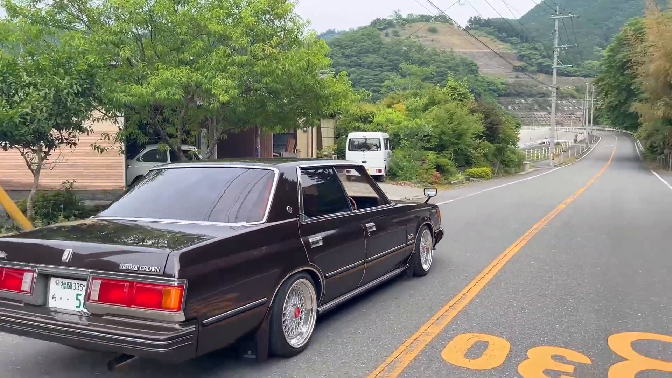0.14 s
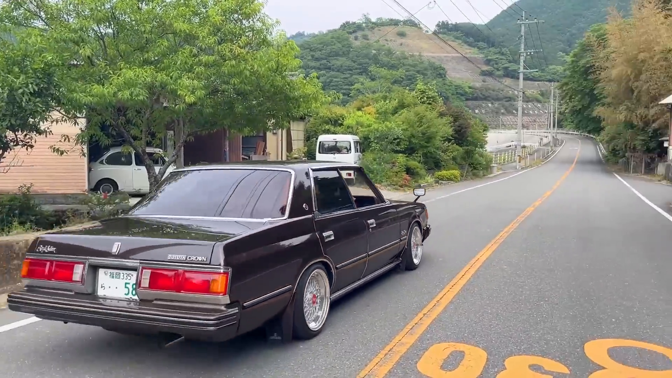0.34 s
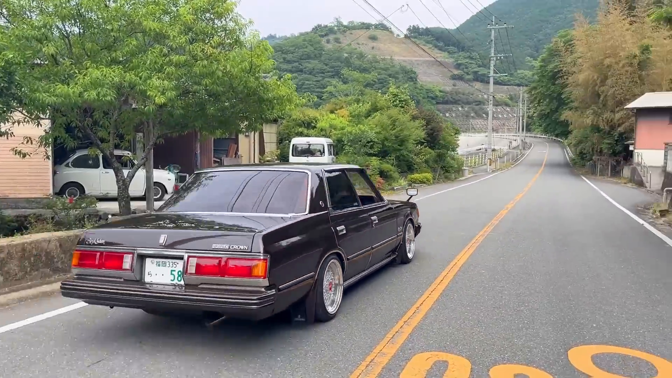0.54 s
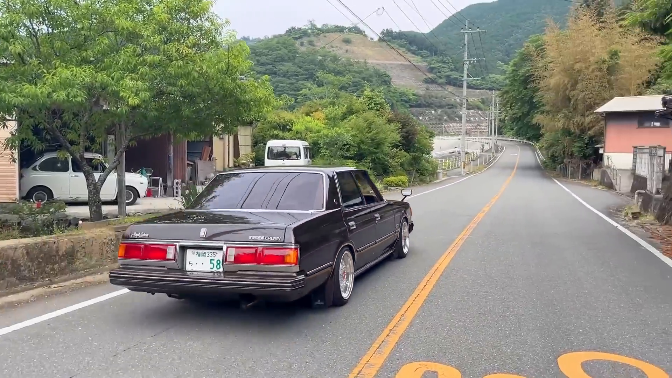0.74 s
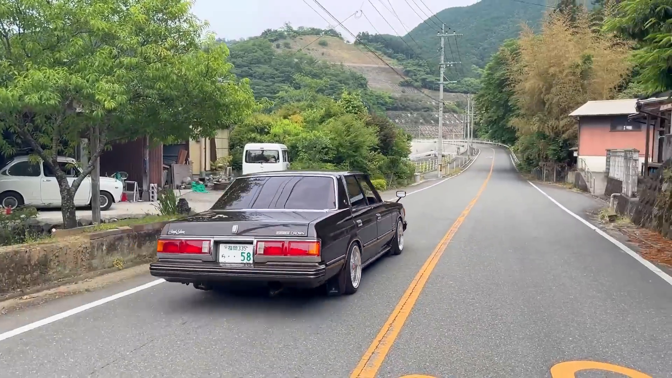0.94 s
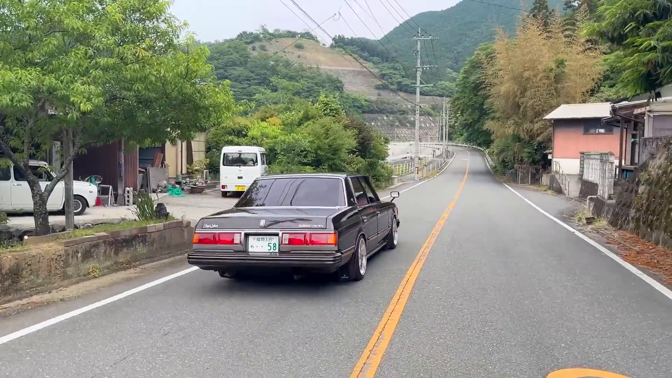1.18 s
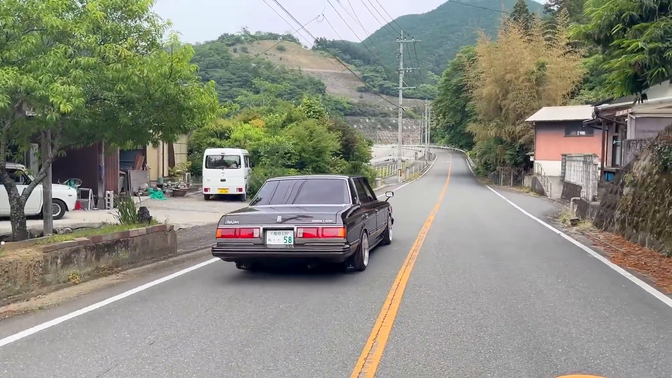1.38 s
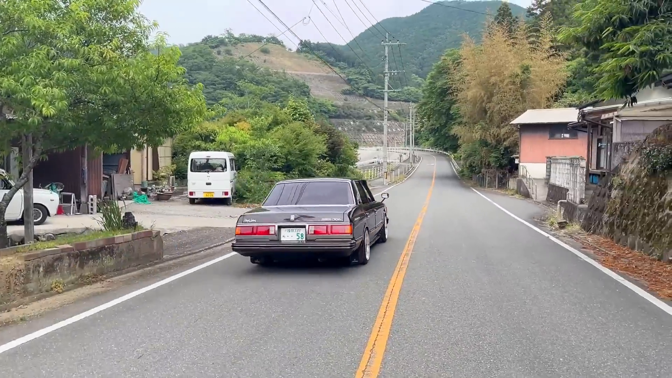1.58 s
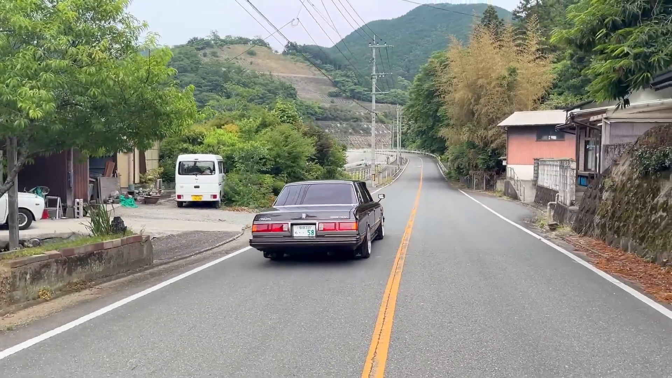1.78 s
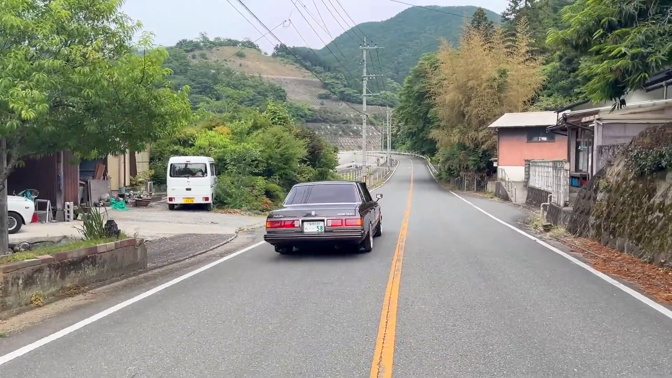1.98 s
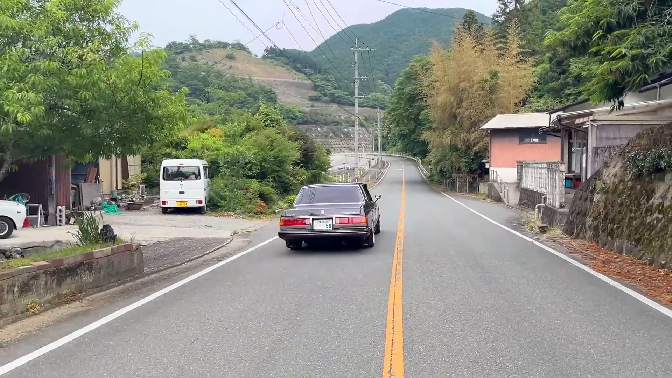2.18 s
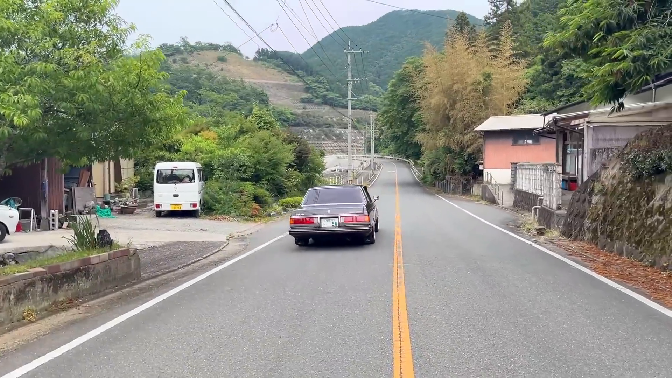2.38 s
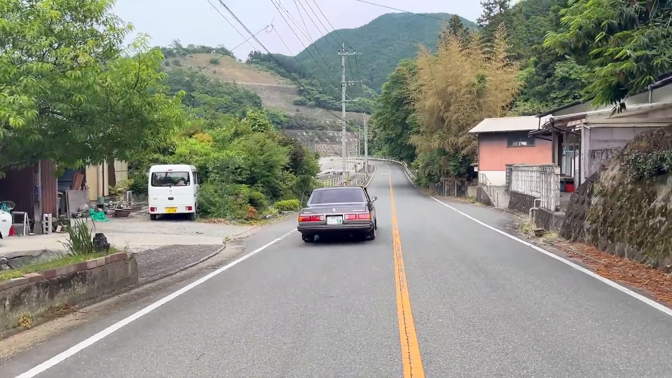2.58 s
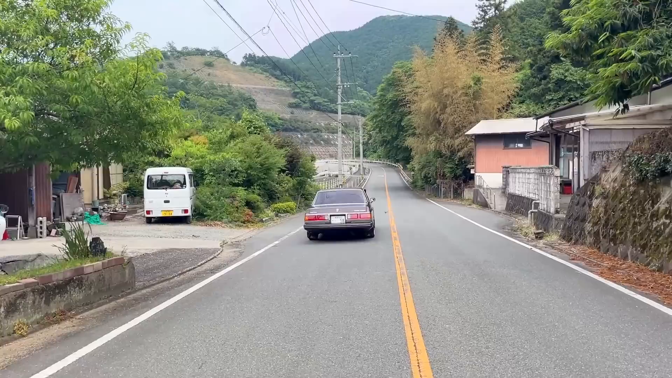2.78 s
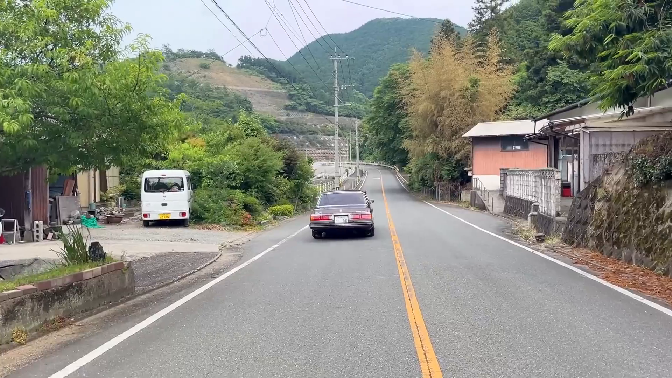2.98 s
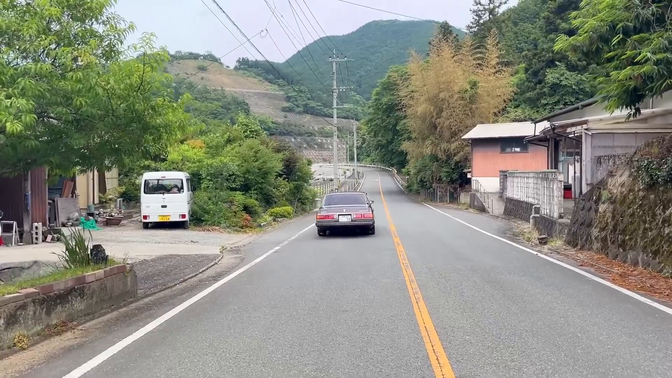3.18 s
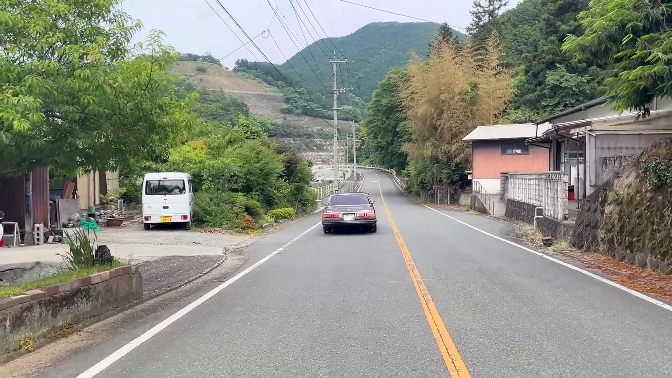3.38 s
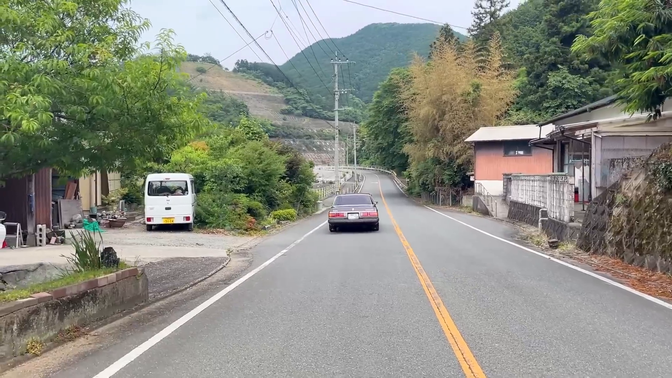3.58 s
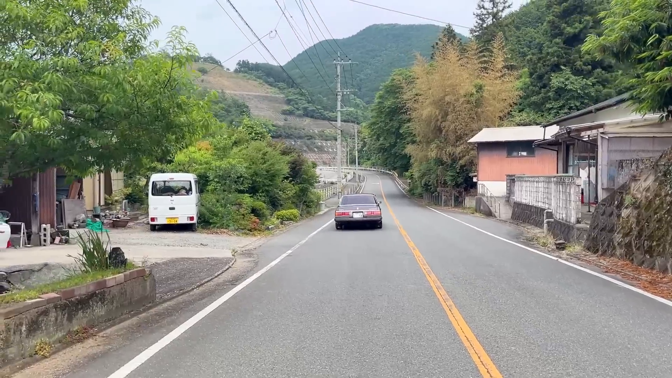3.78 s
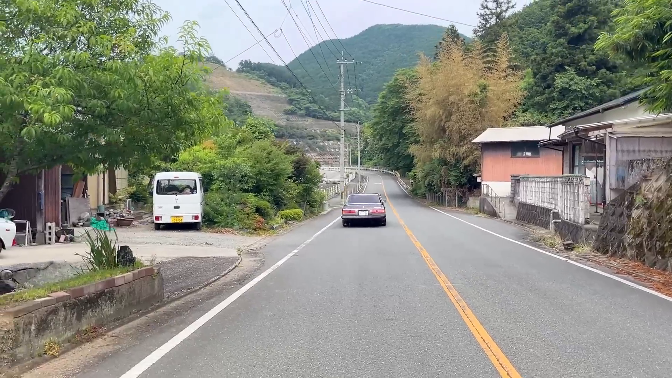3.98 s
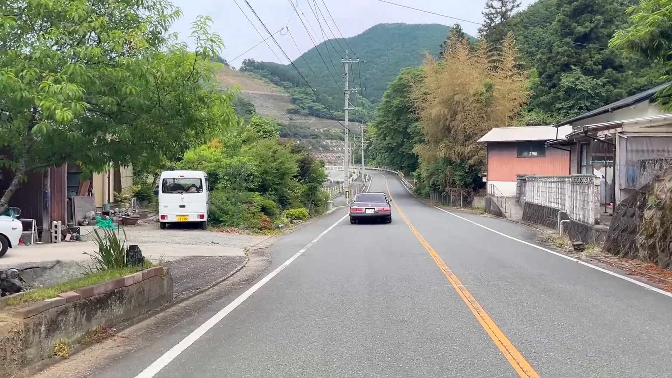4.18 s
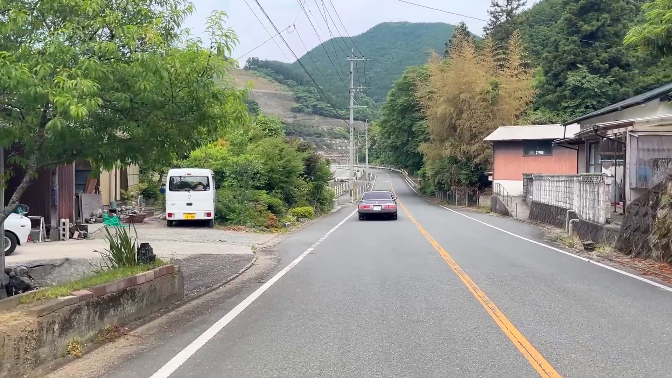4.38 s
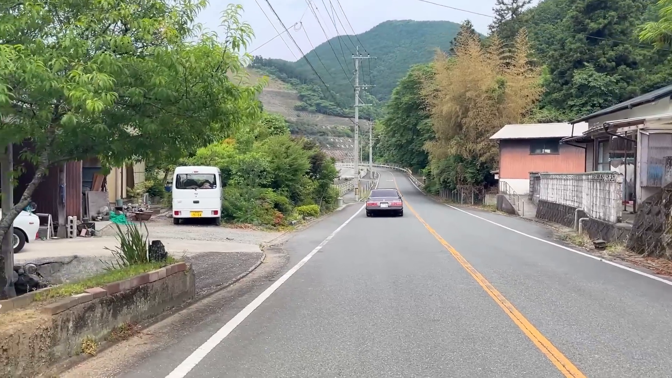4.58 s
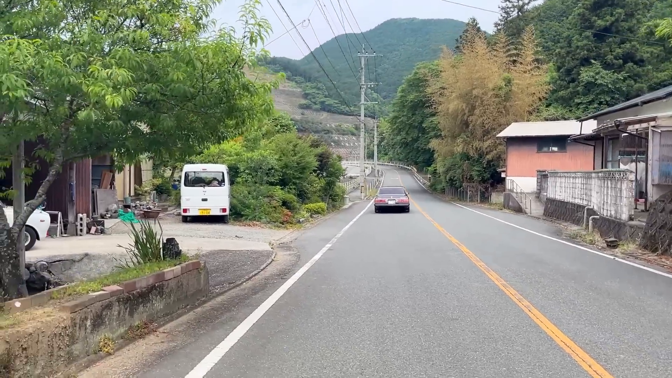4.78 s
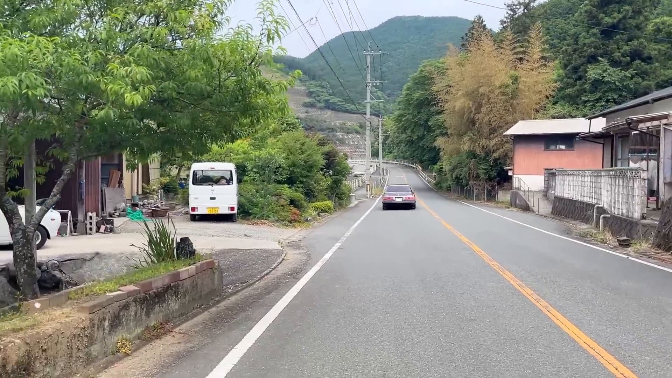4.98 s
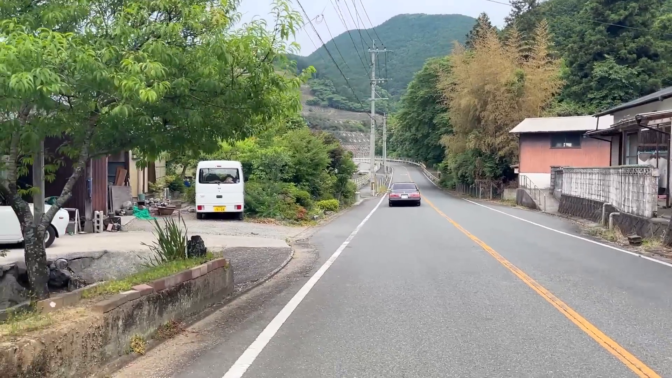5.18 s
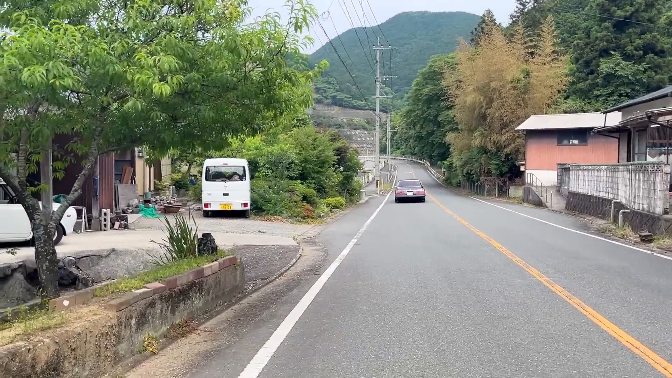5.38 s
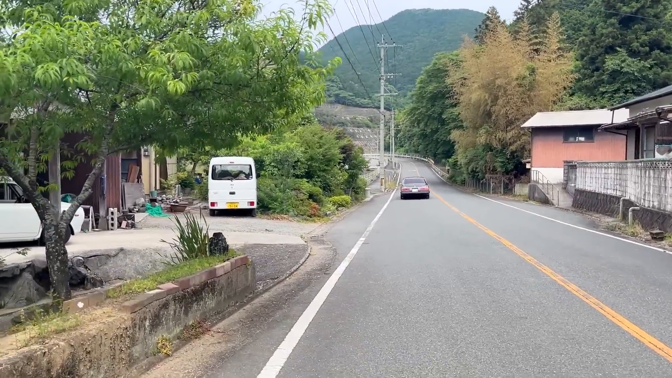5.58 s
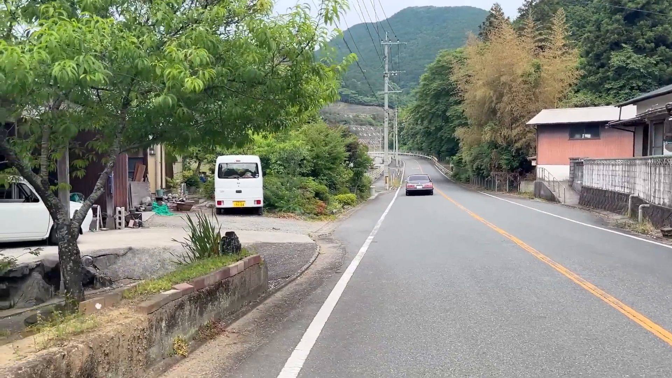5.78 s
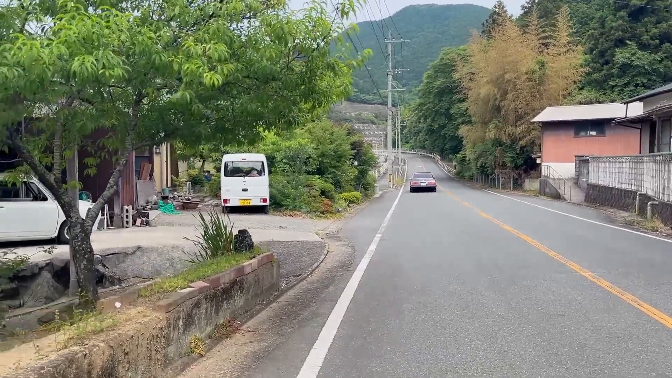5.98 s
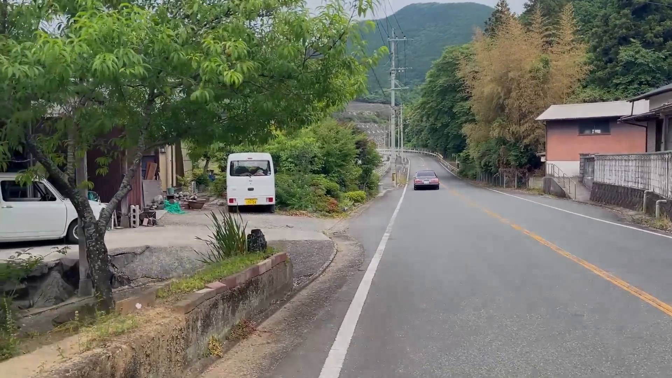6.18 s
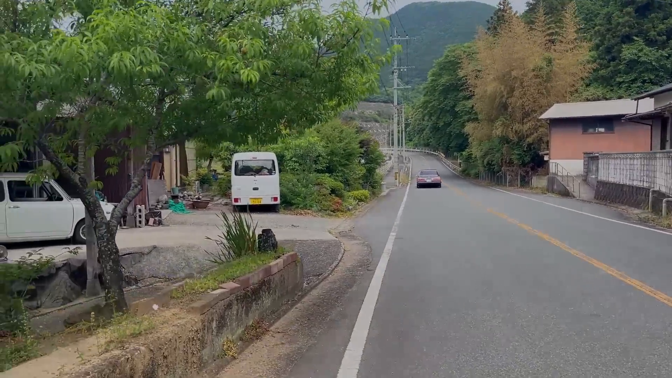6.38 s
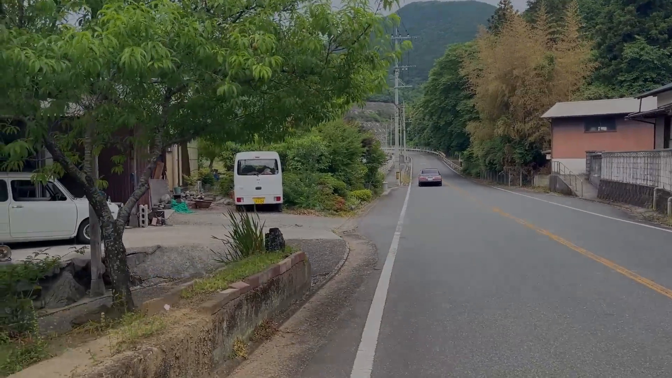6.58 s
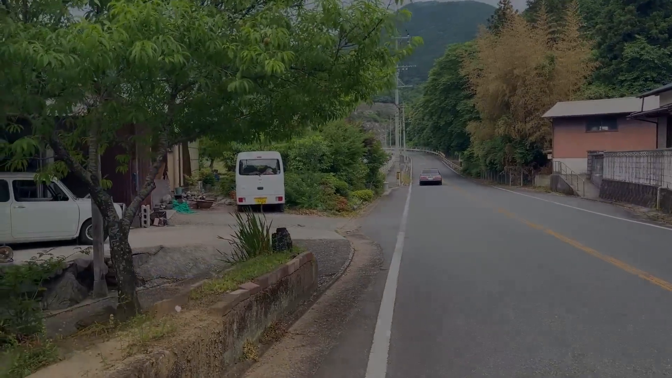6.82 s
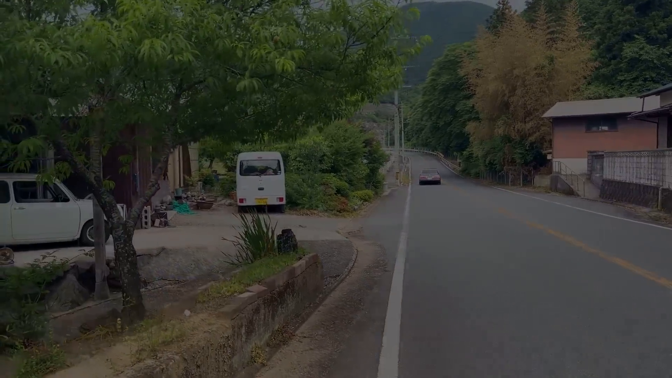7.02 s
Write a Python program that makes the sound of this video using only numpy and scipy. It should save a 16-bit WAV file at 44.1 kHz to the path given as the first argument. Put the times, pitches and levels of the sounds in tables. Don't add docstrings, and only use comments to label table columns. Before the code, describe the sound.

A six-cylinder sedan pulls away close by with a deep exhaust drone, shifts up, and fades down a village road, with light handling ticks.

```python
import sys
import numpy as np
from scipy import signal
from scipy.fft import rfft, irfft, next_fast_len
from scipy.io import wavfile
from scipy.ndimage import uniform_filter1d

SR = 44100
rng = np.random.default_rng(int(sys.argv[2]) if len(sys.argv) > 2 else 0)


def dump(signal):
    limited = np.clip(np.atleast_2d(signal).T, -1, 1)
    pcm = np.round(limited * 32767).astype(np.int16)
    wavfile.write(sys.argv[1], SR, pcm)


def undo_db(level):
    steps = np.asarray(level, float) / 20
    return 10 ** steps


N = 310905

LIFT_S = 1.97
WALLS_S, WALLS_LENGTH_S = 4.2, 0.2
FADE_S, FADE_LENGTH_S = 6.07, 1.58

# (time [s], half length [s], level [dB])
SPOOL_UP = [(0.0042, .2, -10.5)]


def in_time(rows):
    s, *columns = np.transpose(rows)
    return np.array([np.interp(np.arange(N) / SR, s, c) for c in columns])


def at_hz(points, hz):
    table = np.array(points)
    return np.interp(np.log(hz + 1), np.log(table[:, 0]), table[:, 1])


def bumps(rows):
    t = np.arange(0, N + 64, 64) / SR
    total_db = sum(db * np.exp(-((t - s) / half_s) ** 2) for s, half_s, db in rows)
    return np.interp(np.arange(N) / SR, t, total_db)


def ramp(s, length_s):
    return np.clip((np.arange(N) / SR - s) / length_s, 0, 1)


def swell(length_s):
    u = np.linspace(0, 1, max(int(length_s * SR), 8))
    return np.sin(np.pi * u ** 0.81)


def rms_one(x):
    return x / np.sqrt(np.mean(x ** 2) + 1e-20)


def drift(rate):
    r = np.exp(-80 * np.pi * rate / SR)
    white = rng.standard_normal(N // 40 + 2002)
    slow = signal.lfilter([1], [1, -2 * r, r * r], white)[2000:]
    return np.interp(np.arange(N) / 40, np.arange(len(slow)), rms_one(slow))


def resonance(x, hz, width_hz):
    r = np.exp(-np.pi * width_hz / SR)
    zeros = np.array([1, 0, -1]) * (1 - r * r) / 2
    return signal.lfilter(zeros, [1, -2 * r * np.cos(2 * np.pi * hz / SR), r * r], x)


def add(out, s, piece):
    i = int(s * SR)
    out[..., i:i + piece.shape[-1]] += piece[..., :N - i]


def distance_loss():
    start_m, speed_m_s, gain_m_s2 = 3.92, 1.72, 2.22
    t = np.arange(N) / SR
    travelled_m = speed_m_s * t + gain_m_s2 * t * t / 2
    return -20 * np.log10(1 + travelled_m / start_m)


def exhaust(loss_db, shake_db, shake_rad):
    # (time [s], half the firing rate [Hz], firing tone [dB])
    gears = [(0, 34.47, -8), (.14, 37.35, -10.5), (.32, 40.01, -12.5), (.66, 41.57, -15),
             (1.14, 45.2, -15.5), (1.7, 49.05, -17), (1.79, 47.19, -17.5), (2.04, 41.09, -19.5),
             (2.16, 39.85, -20), (2.74, 40.65, -22), (3.3, 42.09, -26), (4.3, 45.41, -29),
             (4.9, 46.66, -28), (5.0, 44.73, -31.5), (5.17, 39.46, -24), (5.86, 38.02, -38),
             (5.98, 30.24, -62), (7.05, 30.63, -63.5)]
    overtone_orders = [3, 4, 6]
    # (frequency [Hz], level up close [dB]) for each overtone
    pipe_response = [
        [(90, -59.5), (103, -34), (122, -24), (130, -24.5), (137, -29), (147, -30)],
        [(119, -39), (137, -22.5), (158, -28), (174, -22.5), (186, -20.5), (200, -27)],
        [(179, -62.5), (206, -27.5), (225, -27.5), (246, -28), (258, -30.5), (272, -39.5), (295, -57.5)],
    ]
    # (time [s], half length [s], level [dB])
    echo_fades = [
        [(2.09, .03, -4.5), (3.42, 0.17, -8), (4.15, 0.11, -5.5), (4.44, 0.08, -5), (4.87, 0.12, -9.5),
         (5.15, 0.057, -19), (5.34, 0.072, -15), (5.7, 0.044, -7), (4.97, 0.026, -4), (7.05, 0.09, 16)],
        [(3.3, 0.59, 1), (4.2, 0.051, -7), (5.08, 0.089, -9), (5.94, 0.069, -17), (6.5, 0.34, -2)],
        [(1.1, 0.24, 2.5), (1.74, 0.1, -7.5), (2.55, 0.22, -10.5), (3.3, .2, -3), (4.98, 0.014, -4),
         (7.0, 0.087, 0.5), (5.15, 0.034, -13), (5.75, 0.14, -12), (6.5, 0.23, -12)],
        [(3.8, 0.072, -14), (2.16, 0.12, -4), (5.12, 0.04, -6), (5.35, 0.015, 4), (5.45, 0.017, 6.5),
         (5.95, 0.043, -10)],
    ]
    # (multiple of the cycle [1], level re whole drone [dB])
    uneven = [(4.03, -24.5), (5, -38.5), (7, -38), (8.13, -24), (10, -39), (14, -33.5), (14.99, -26),
              (15.94, -29.5), (21.22, -35), (23.98, -31.5), (32.96, -40.5), (30.14, -32.5), (35.92, -31.5),
              (42.2, -35.5)]
    # (frequency [Hz], width [Hz], level re whole drone [dB])
    pipe_modes = [(472, 73, -33), (570, 57, -35.5), (313, 68, -35)]

    half_hz, firing_db = in_time(gears)
    far = loss_db / loss_db[-1]
    level_curves = [firing_db]
    for order, pipe in zip(overtone_orders, pipe_response):
        flicker_db = 1.8 * far * drift(5.9)
        level_curves.append(at_hz(pipe, order * half_hz) + 0.68 * loss_db + flicker_db)
    strong_db = [db + bumps(fades) for db, fades in zip(level_curves, echo_fades)]
    power = np.sum(undo_db(np.array(strong_db)) ** 2, axis=0)
    whole_db = 10 * np.log10(uniform_filter1d(power, size=SR // 3))
    choked_db = bumps(SPOOL_UP)

    cycle = 2 * np.pi * np.cumsum(half_hz) / SR / 3
    tones = list(zip([6, 9, 12, 18], strong_db))
    tones += [(k, whole_db + db) for k, db in uneven]
    out = np.zeros((2, N))
    for k, level_db in tones:
        wobble = k / 6 if k % 3 == 0 else 0.3 * k
        spread = 0.045 * k * k
        phase = k * cycle - spread + shake_rad * wobble * drift(15)
        muffled_db = -0.06 * np.maximum(k * half_hz / 3 - 500, 0)
        patchy_db = 0
        if k > 20:
            patchy_db = 2.5 * drift(1.7) + choked_db * (k > 24)
        tone_db = level_db + muffled_db + patchy_db + shake_db * wobble * drift(11.0)
        tone = np.sqrt(2) * undo_db(tone_db)
        lean = 0.019 * k / 6 * drift(0.16) + 0.016 * drift(5.4)
        out += tone * np.sin(phase + lean * np.array([[1], [-1]])) * undo_db([[0.2], [-0.2]])

    puffs = rng.standard_normal(N) * (1 + 0.88 * np.cos(6 * cycle))
    for hz, width_hz, db in pipe_modes:
        rasp = resonance(resonance(puffs, hz, width_hz), hz, width_hz)
        out += undo_db(whole_db + db) * rms_one(rasp)
    return out


def roar_zones(loss_db):
    # (level up close [dB], share of distance loss [1], gain under load [dB], gain from the
    # walls [dB], change in the final fade [dB])
    zone_levels = [
        (-39, 0.33, 3, 2, -13.5),
        (-43.5, 0.2, 3, 1.5, -10),
        (-52, 0.41, 3.5, -0.5, -12.5),
        (-57, 0.97, 2, -0.5, -10),
    ]
    fade_haste = [1.0, 0.83, 0.87, 0.18]

    load = 1 - ramp(LIFT_S - 0.2, 0.19)
    walls = ramp(WALLS_S, WALLS_LENGTH_S)
    gone = ramp(FADE_S, FADE_LENGTH_S)
    zones_db = []
    for (db, share, load_db, wall_db, gone_db), haste in zip(zone_levels, fade_haste):
        car_db = db + share * loss_db + load_db * load
        zones_db.append(car_db + wall_db * walls + gone_db * gone ** haste)
    zones_db = np.array(zones_db)
    zones_db[0] += bumps(SPOOL_UP)
    return zones_db


def roar(zones_db, patchy_db):
    # (frequency [Hz], spectral level [dB per Hz])
    colour = [(60, -100), (130, -72), (240, -67), (400, -70), (700, -76), (1300, -80), (1700, -84.5),
              (2800, -90.5), (4200, -96.5), (6500, -101), (8500, -104), (12000, -107), (15500, -109)]
    zone_hz = [450, 1400, 4000, 8000]

    size = next_fast_len(N)
    hz = np.arange(size // 2 + 1) * SR / size
    coloured = rfft(rng.standard_normal((3, size))) * undo_db(at_hz(colour, hz)) * np.sqrt(SR / 2)
    change_db = zones_db - zones_db.mean(axis=1, keepdims=True)
    change_db[3] -= 4.6
    out = np.zeros((3, N))
    together = drift(15.0)
    for step in np.arange(-5, 4.1):
        centre_hz = 1000 * 2 ** step
        octaves_off = np.clip(np.log2((hz + 1) / centre_hz), -1, 1)
        window = np.cos(np.pi / 2 * octaves_off) ** 2
        place = np.interp(np.log(centre_hz), np.log(zone_hz), np.arange(4))
        weights = np.maximum(1 - abs(place - np.arange(4)), 0)
        flutter_db = patchy_db * (0.14 * together + drift(19))
        band = irfft(coloured * window, size)[:, :N]
        out += band * undo_db(weights @ change_db + flutter_db)
    return out


def buzz(middle_db, flutter_db):
    # (frequency [Hz], wander [Hz])
    panel_modes = [(1325, 55), (1890, 22), (2642, 18)]
    # (level at the start [dB], fall [dB/s])
    steady = [(-50.5, 0.5), (-54, 3), (-49, 6.0)]
    # (time [s], half length [s], level [dB])
    shaken_loose = [
        [(.12, 0.083, 2), (.66, 0.019, 9.5), (.97, 0.24, 5), (1.35, 0.012, 8), (1.52, 0.19, 8.5),
         (2.0, 0.037, 6.5)],
        [(.5, 0.058, 15), (.67, .04, 9.5), (.9, .12, 5.5), (1.42, .07, 10), (1.95, 0.057, 5)],
        [(0, 0.047, 12), (.2, 0.059, 8), (.4, 0.11, 7.5), (.66, 0.024, 4.5), (1.2, .1, 3), (1.75, 0.034, 17),
         (1.87, .04, 13)],
    ]
    # (frequency [Hz], width [Hz], level re middle roar [dB])
    faint_modes = [(2120, 63, -15.5), (2400, 51, -14.5), (3670, 740, -13.5), (6230, 170, -24)]
    # (frequency [Hz], width [Hz], level re middle roar [dB])
    wall_bands = [(1087, 100, -11), (1476, 67, -15.5), (2070, 41, -30), (2300, 42, -20), (2630, 67, -27)]

    out = np.zeros((3, N))
    s = np.arange(N) / SR
    near = np.clip((LIFT_S - s) / 0.072, 0.12, 1)
    late_db = (middle_db - middle_db[int(2.4 * SR)] - 2.6 * (s - 2.4)) * (s > 2.4)
    for (hz, wander_hz), (db, fall_db), bursts in zip(panel_modes, steady, shaken_loose):
        shaken_db = db - fall_db * np.minimum(s, 2.4) + bumps(bursts)
        level_db = shaken_db - 1 - 4 * (1 - near) + late_db
        phase = 2 * np.pi * np.cumsum(hz + wander_hz * drift(44.4)) / SR
        echoes = np.array([0 * s, 3.5 * drift(12.0), 2.6 * drift(18)])
        out += np.sqrt(2) * undo_db(level_db + flutter_db * drift(32)) * np.sin(phase + echoes)

    white = rng.standard_normal((3, N))
    for hz, width_hz, db in faint_modes:
        ring = rms_one(resonance(resonance(white, hz, width_hz), hz, 2 * width_hz))
        out += near * undo_db(middle_db + db + 2 * drift(31)) * ring
    walls = ramp(WALLS_S, WALLS_LENGTH_S)
    for hz, width_hz, db in wall_bands:
        ring = rms_one(resonance(resonance(white[::-1], hz, width_hz), hz, 2 * width_hz))
        out += walls * undo_db(middle_db + db + 2.0 * drift(2.5)) * ring
    return out


def ports(direct, diffuse):
    # (frequency [Hz], lead [rad])
    lead = [(300, 0), (600, .3), (1500, 1.6), (2900, 1.0), (4800, .6), (6900, -1.6), (8300, -3.14),
            (9800, -5.0), (12000, -6.28), (15000, -9.0)]
    # (frequency [Hz], likeness 0-1 [1])
    likeness = [(60, .99), (280, .96), (450, .8), (800, .55), (1500, .55), (4000, .7), (8000, .9),
                (14000, .9)]
    # (frequency [Hz], left-right [dB])
    balance = [(200, 6), (500, -3.5), (1000, 3.5), (2000, 0.5), (4500, 5.5), (8000, 3.5)]

    size = next_fast_len(N + 4096)
    hz = np.arange(size // 2 + 1) * SR / size
    alike = np.clip(at_hz(likeness, hz), 0, 1)
    side = np.array([[0.5], [-0.5]])
    shared = np.sqrt(alike) * rfft(direct, size) * np.exp(1j * side * at_hz(lead, hz))
    both = shared + np.sqrt(1 - alike) * rfft(diffuse, size)
    return irfft(both * undo_db(side * at_hz(balance, hz)), size)[:, :N]


def rumble_level(loss_db):
    # (time [s], half length [s], level [dB])
    swells = [(.76, 0.067, 2.5), (1.65, .1, 1), (2.36, 0.072, 3.5), (3.2, .2, 3.5), (4.22, 0.13, 9.5),
              (5.1, 0.17, 12), (5.85, 0.15, 9), (6.39, 0.071, -8)]
    fade_db = -1 * ramp(FADE_S + 0.54, 0.25)
    return -49.5 + 0.62 * loss_db + fade_db + bumps(swells) - 3


def rumble(low_db, own_share):
    white = rng.standard_normal((3, N))
    band = signal.butter(2, [55, 150], "band", fs=SR, output="sos")
    low = signal.sosfilt(band, white[0] + own_share * white[1:])
    return undo_db(low_db + 9.5 + 2.0 * drift(3.5)) * rms_one(low)


def wind(low_db, breeze_db):
    # (time [s], length [s], level [dB])
    thumps = [(0.067, 0.038, -22), (0.172, .025, -17), (0.295, 0.038, -23), (1.48, 0.049, -27),
              (4.215, 0.044, -34), (4.5, 0.045, -37), (5.19, 0.05, -32.5), (6.464, 0.06, -50),
              (6.851, .02, -46)]

    gust = undo_db(low_db + breeze_db + 1.6 * drift(17))
    for s, length_s, db in thumps:
        add(gust, s, undo_db(db) * swell(length_s))
    white = rng.standard_normal((3, N))
    band = signal.butter(1, [42, 100], "band", fs=SR, output="sos")
    low = signal.sosfilt(band, 0.5 * white[0] + white[1:])
    smooth = signal.sosfilt(signal.butter(2, 250, fs=SR, output="sos"), low)
    return gust * rms_one(smooth)


def ticks():
    # (time [s], peak [dB], pitch [Hz], left-right [dB], length [ms])
    snaps = [(1.253, -29.5, 1310, 9, 0.29), (2.738, -23.5, 1120, -4.5, 0.5), (3.37, -23.5, 1109, 2, 0.4),
             (4.204, -20.5, 1250, -1, 0.49), (5.168, -31, 1090, -2.5, 0.49), (6.48, -14, 1160, 4.5, 0.33),
             (6.496, -29, 1194, 6, 0.17), (6.523, -31.5, 1100, -5, 0.18), (6.622, -37, 1200, 1, 0.69)]

    out = np.zeros((2, N))
    t = np.arange(-100, 600) / SR
    for s, db, hz, pan_db, length_ms in snaps:
        pulse = np.exp(-(t / length_ms * 1000) ** 2 / 2)
        body = -np.cos(2 * np.pi * hz * t) * pulse + 0.13 * np.cos(2 * np.pi * 2700 * t) * pulse
        shell = 0.23 * np.cos(2 * np.pi * 1750 * t) * np.exp(-abs(t) / 0.0051)
        knock = 0.47 * np.sin(2 * np.pi * 400 * (t - 0.0006)) * np.exp(-abs(t - 0.001) / 0.00074)
        crack = rng.standard_normal((2, len(t))) * 0.011 * np.exp(-abs(t) / 0.0005)
        both = np.array([body + shell, np.roll(body, 7) - 0.5 * shell])
        gain = undo_db(db + pan_db * np.array([[0.5], [-0.5]]))
        add(out, s - 0.0012, gain * (both + knock + crack))
    return out


def rustles():
    # (start [s], length [s], centre [Hz], level [dB], left-right [dB])
    cloth = [(2.574, 0.044, 3860, -56.5, 5), (4.18, .026, 1430, -47, 16.5), (4.265, .11, 1285, -45, 6.5),
             (4.392, 0.068, 1220, -54.5, 13), (4.482, 0.062, 776, -41.5, 2), (4.504, .026, 4040, -62.5, 5),
             (5.295, .0092, 11500, -70.5, 6), (2.58, .05, 11200, -63, 5), (4.185, 0.029, 11070, -70, -4.5),
             (5.841, 0.08, 11500, -80.5, 10.5), (5.921, .0086, 11200, -69.5, 5), (6.48, .1, 910, -47, 3),
             (6.74, .14, 11560, -83, 2.5)]
    grit = [(3.343, .102, 5100, -66, 18), (4.177, .031, 4650, -56, 4.4), (5.63, 0.058, 4700, -65, 12),
            (6.478, 0.0047, 2460, -43.5, 2), (6.478, .005, 5600, -59.5, 1.5), (6.73, 0.19, 4290, -69.5, 5)]
    squeaks = [(2.999, .44, 5720, -76, 21), (5.418, .28, 5200, -83, 38), (6.675, 0.26, 2050, -59, 2)]

    out = np.zeros((2, N))
    for rows, width_over_centre in [(cloth, 0.84), (grit, 0.48), (squeaks, 0.098)]:
        for s, length_s, hz, db, pan_db in rows:
            shape = swell(length_s)
            grains = rng.standard_normal((4, 20000))[:, :len(shape)]
            clumps = undo_db(3.0 * rms_one(uniform_filter1d(grains[3], size=90)))
            burst = clumps * (1.2 * grains[0] + grains[1:3])
            for _ in range(3):
                burst = rms_one(resonance(burst, hz, width_over_centre * hz))
            add(out, s, undo_db(db + pan_db * np.array([[0.5], [-0.5]])) * shape * burst)
    return out


def valley():
    # (frequency [Hz], width [Hz], level [dB])
    hum_bands = [(266, 88, -51.5), (1310, 120, -60.5), (2110, 300, -67), (174.8, 24, -65.5)]

    white = rng.standard_normal((3, N))
    out = np.zeros((2, N))
    for hz, width_hz, db in hum_bands:
        near_alike = white[0] + min(hz / 1200, 1) * white[1:]
        hum = resonance(resonance(near_alike, hz, width_hz), hz, width_hz)
        out += undo_db(db + 3.0 * drift(33)) * rms_one(hum)
    return out


def scene():
    loss_db = distance_loss()
    zones_db = roar_zones(loss_db)
    low_db = rumble_level(loss_db)
    hiss = roar(zones_db, patchy_db=1.0) + buzz(zones_db[1], flutter_db=-0.5)
    car = exhaust(loss_db, shake_db=0.3, shake_rad=0.03)
    car = car + ports(hiss[0], hiss[1:]) + rumble(low_db, own_share=0.2)
    close = wind(low_db, breeze_db=12.5) + ticks() + rustles()
    return car + close + valley()


def drop_bands(x, gaps):
    size = next_fast_len(N)
    hz = np.arange(size // 2 + 1) * SR / size
    keep = np.prod([(hz < low) | (hz > high) for low, high in gaps], axis=0)
    return irfft(rfft(x, size) * (keep + undo_db(-57)), size)[:N]


def low_pass(x):
    return signal.sosfilt(signal.butter(12, 14910, fs=SR, output="sos"), x)


def record(dry):
    # (low edge [Hz], high edge [Hz])
    sum_gaps = [(7650, 8950), (14500, 22050)]
    difference_gaps = [(11050, 13050)]

    dry = dry * np.minimum(np.arange(N) / 130, 1)
    low_cut = signal.butter(2, 25, "high", fs=SR, output="sos")
    left, right = signal.sosfilt(low_cut, dry)
    both = drop_bands(left + right, sum_gaps)
    apart = drop_bands(left - right, difference_gaps)
    mix = np.array([both + apart, both - apart]) / 2
    return low_pass(mix)


dry = scene()
out = record(dry)
dump(out)
```